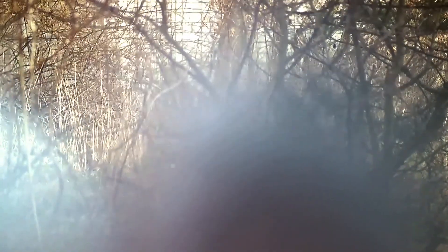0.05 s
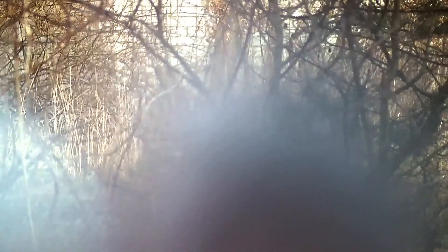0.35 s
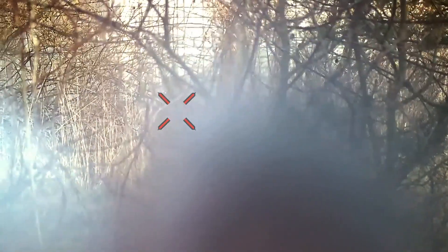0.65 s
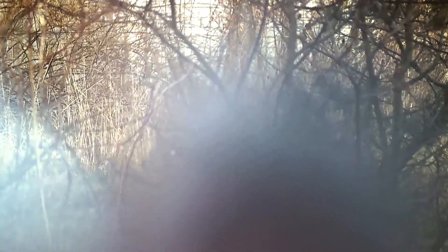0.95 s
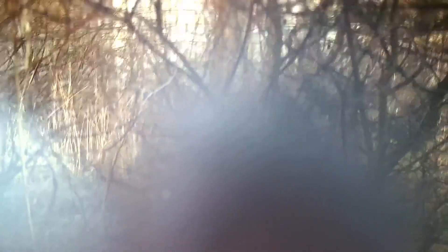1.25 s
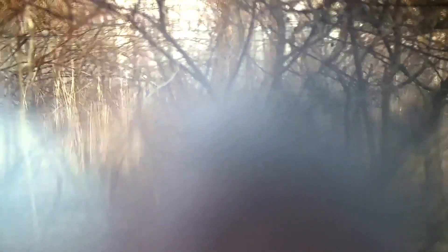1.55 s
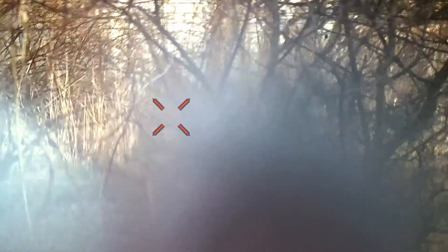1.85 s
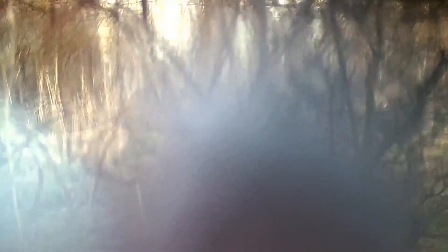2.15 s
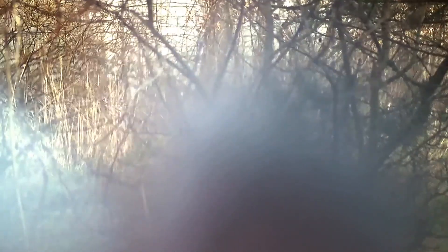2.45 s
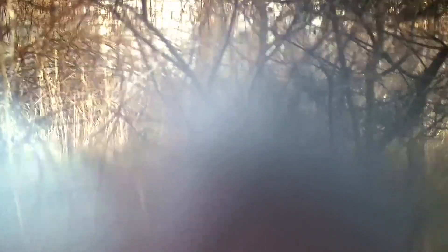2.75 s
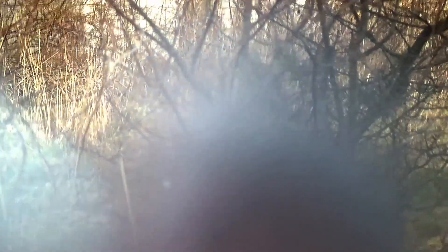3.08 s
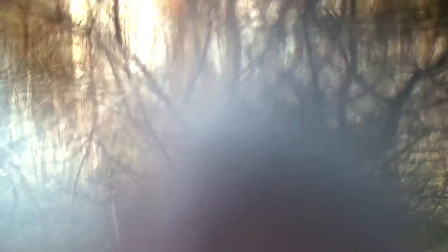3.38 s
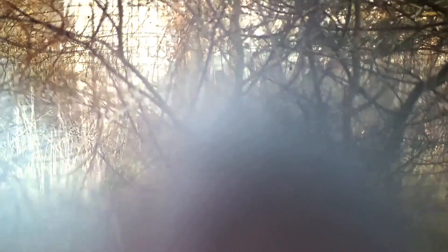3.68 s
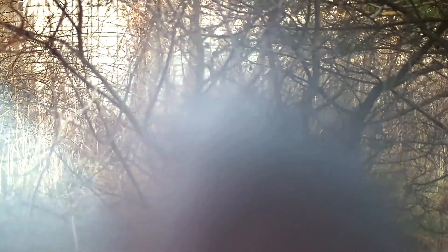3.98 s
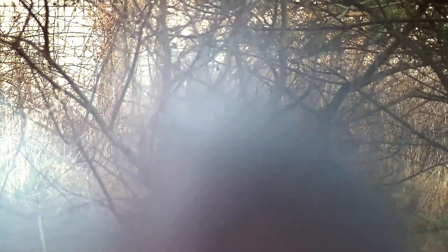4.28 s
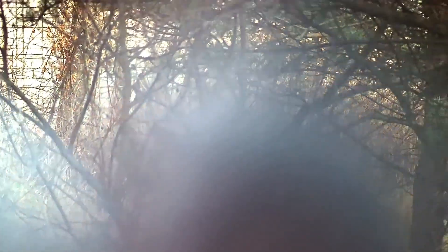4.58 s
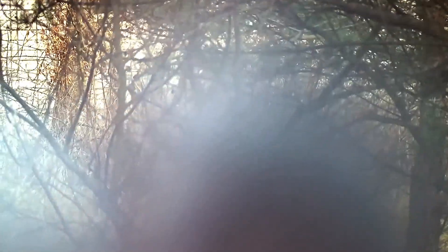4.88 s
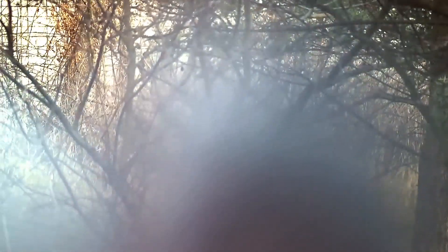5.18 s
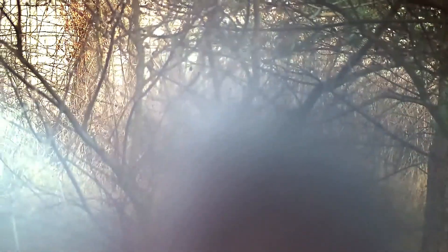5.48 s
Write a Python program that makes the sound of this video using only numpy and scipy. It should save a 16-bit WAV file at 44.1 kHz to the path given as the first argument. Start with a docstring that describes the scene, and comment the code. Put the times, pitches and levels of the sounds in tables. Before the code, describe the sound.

Close airsoft rifle shots outdoors, each a gear whirr and hard clack, come in a steady run, pause briefly, then three more follow.

```python
"""In a wood, an electric airsoft rifle fires sixteen single shots, heard from a camera on the gun.
Each shot is one gearbox cycle: the motor whines up, gears rattle, the piston slams home, the motor brakes.
Tooth forces drive the resonant modes of the gun body, and recoil sets the camera mount swinging.
The trigger clicks back between most shots, the spring rings on faintly in free vibration,
and scattering among the trees returns a soft tail."""
import sys
import numpy as np
from scipy import signal
from scipy.fft import rfft, irfft
from scipy.io import wavfile
from scipy.ndimage import uniform_filter1d

SR = 44100
rng = np.random.default_rng(int(sys.argv[2]) if len(sys.argv) > 2 else 0)


def inscribe(sig):
    """Save sig as 16-bit PCM at rate SR to the path in sys.argv[1].

    A 1-D sig is mono; a 2-D sig holds one channel per row.
    Samples are clipped to [-1, 1] before scaling.
    """
    pcm = np.round(np.clip(np.atleast_2d(sig).T, -1, 1) * 32767)
    wavfile.write(sys.argv[1], SR, pcm.astype(np.int16))


N = 248061
T = np.arange(SR // 4) / SR  # time within one event


def amp(db):
    """Decibels to amplitude ratio."""
    return 10 ** (np.asarray(db) / 20)


def unit_rms(x):
    """Normalisation to rms 1."""
    return x / np.sqrt(np.mean(x ** 2) + 1e-20)


def log_interp(points, hz):
    """Interpolation on a log-frequency axis."""
    f, value = np.transpose(points)
    return np.interp(np.log(hz + 1), np.log(f + 1), value)


def add(mix, start_s, sound):
    """Superposition: a sound joins the mix at start_s."""
    start = round(start_s * SR)
    sound = sound[max(-start, 0):]
    part = mix[max(start, 0):][:len(sound)]
    part += sound[:len(part)]


def noise(spectrum, size):
    """Spectral shaping: noise of rms 1 from (frequency_hz, gain_db) points."""
    gain = amp(log_interp(spectrum, np.fft.rfftfreq(size, 1 / SR)))
    return unit_rms(irfft(rfft(rng.standard_normal(size)) * gain, size))


def lowpass(x, hz):
    """Steep linear-phase low-pass."""
    return signal.oaconvolve(x, signal.firwin(601, hz, window=("kaiser", 8), fs=SR), "same")


def swell(t, peak_s, width_s):
    """Gaussian pulse of height 1."""
    return np.exp(-((t - peak_s) / width_s) ** 2)


# spectrum of the quiet wood: frequency_hz, gain_db
AIR_SPECTRUM = [(25, 1), (80, -5), (200, -13.5), (600, -10), (1100, -12.5), (2600, -14.5), (3400, -28),
                (5400, -30)]
def air(level_db=-77):
    """Ambient noise: a steady floor, strongest in the bass."""
    return amp(level_db) * noise(AIR_SPECTRUM, N)


# reverberation time among the trees: frequency_hz, t60_s
TREE_DECAY = [(100, 0.35), (500, 0.61), (1500, 0.57), (3000, 0.73), (5500, 0.5)]
def trees(x, far_db=-30, near_db=-17, near_t60=0.16):
    """Scattering: ground and twigs reflect quickly, the trunks return a long faint tail."""
    hz, frame_s, bands = signal.stft(rng.standard_normal(SR), SR, nperseg=256)
    decay = amp(-60 * frame_s / log_interp(TREE_DECAY, hz)[:, None])
    t = np.arange(SR) / SR
    far = signal.istft(bands * decay, SR, nperseg=256)[1][:SR] * np.minimum(t / 0.037, 1)
    near = rng.standard_normal(SR) * amp(-60 * t / near_t60) * (t > .008)
    response = amp(far_db) * far / np.linalg.norm(far) + amp(near_db) * near / np.linalg.norm(near)
    return signal.fftconvolve(x, response)[:N]


# modes of the spring and metal parts: pitch_hz, level_db, t60_s
SPRING_MODES = [(845, -62, 1), (962, -64, 1.6), (1036, -64, 2.2), (1324, -60, 1.8), (1518, -60, .8),
                (1653, -51, .72), (1879, -63, 1.7), (2272, -62, 1.6), (2509, -64, 1.7), (3025, -60, .9),
                (3375, -62, .78), (4024, -61, 1.1), (5222, -67, .85)]
def spring_ring(earlier_s=0.24):
    """Free vibration: metal parts ring after each blow, and at first from an earlier shot."""
    t, out = np.arange(2 * SR) / SR, np.zeros(N)
    ring = sum(amp(db - 60 * t / t60) * np.sin(2 * np.pi * hz * t) for hz, db, t60 in SPRING_MODES)
    add(out, -earlier_s, ring)
    for _, blow_s, _ in SHOT_CYCLES:
        add(out, blow_s + rng.uniform(0, 0.0052), ring)
    return out


def swing(hz, t60, rise_s=0.0025):
    """Damped oscillation, at nearly the same pitch each time."""
    pitch_hz = hz * (1 + .03 * rng.standard_normal())
    return np.sin(2 * np.pi * pitch_hz * T) * amp(-60 * T / t60) * (1 - np.exp(-T / rise_s))


# shifts of the gun in the hands: start_s, gain_db
HAND_BUMPS = [(3.923, -18), (4.392, -48), (4.686, -54.5)]
def handling(rustle_db=-9):
    """Impulse response: each shift of the gun gives a low thump and a rustle."""
    out = np.zeros(N)
    for start_s, db in HAND_BUMPS:
        add(out, start_s, amp(db) * (swing(hz=65, t60=0.066) + amp(rustle_db) * click()))
    return out


# pushes on the mount after the pull, in a nominal cycle: delay_s, pitch_hz, gain_db, t60_s
RECOIL_PUSHES = [(0.018, 110.1, -28, 0.056), (0.054, 82.05, -36, 0.039), (0.088, 62, -20.5, 0.066),
                 (0.104, 131.8, -19, 0.03)]
def recoil(rumble_db=-50, rumble_t60=0.95):
    """Reaction forces swing the camera mount, which rumbles on after the blow."""
    out = np.zeros(N)
    decay = amp(rumble_db - 60 * np.arange(SR) / SR / rumble_t60)
    for pull_s, blow_s, shot_db in SHOT_CYCLES:
        pace = CYCLE_S / (blow_s - pull_s)
        for delay_s, hz, db, t60 in RECOIL_PUSHES:
            add(out, pull_s + delay_s / pace, amp(db + shot_db) * swing(hz, t60))
        add(out, blow_s, noise([(15, 5), (60, -11), (200, -16), (1000, -50.5)], SR) * decay)
    return out


# resonances of the gun body: pitch_hz, bandwidth_hz, gain_db
BODY_MODES = [(513.6, 43, -1.5), (750, 77, 8), (852.5, 150, 4), (1020, 84, 4), (1440, 200, 3.5),
              (1740, 142, 6.5), (2217, 220, 3.5), (2492, 200, 0), (2975, 260, 2.5), (3737, 120, 0),
              (4960, 95, -14)]
def body(force, direct=0.011):
    """Modal resonance: a force rings the body's modes; a little passes straight through."""
    t = T[:SR // 20]
    ring = np.zeros(len(t))
    for hz, bandwidth_hz, db in BODY_MODES:
        damping = np.pi * bandwidth_hz
        ring += amp(db) * 2 * damping / SR * np.exp(-damping * t) * np.cos(2 * np.pi * hz * t)
    return signal.fftconvolve(force, ring)[:len(force)] + direct * force


def scrape(level_db=-21, peak_s=0.03, width_s=0.0071):
    """Sliding friction: the returning trigger excites the body."""
    force = signal.lfilter([1], [1, -.6], rng.standard_normal(len(T)))
    return amp(level_db) * unit_rms(body(force)) * swell(T, peak_s, width_s)


def click(chatter_t60=0.048, snap=5, tilt=0.7, level_db=1):
    """Impact excitation: a small part snaps against its stop and chatters briefly."""
    force = rng.standard_normal(len(T)) * amp(-60 * T / chatter_t60)
    force[0] += snap
    sound = body(signal.lfilter([1], [1, -tilt], force))
    return amp(level_db) * sound / abs(sound).max()


# returns of the trigger: click_s, gain_db, rebound_gain_db
TRIGGER_RETURNS = [(.327, -16, -35), (.604, -13, -19.5), (1.212, -12.5, -15.5), (1.528, -18.5, -38),
                   (1.871, -13.5, -34), (2.444, -16, -27.5), (2.778, -14, -38.5), (3.111, -12.5, -30),
                   (3.406, -11, -15.5), (3.702, -14.5, -32), (5.001, -17, -21.5), (5.304, -11.5, -16)]
def trigger(scrape_lead_s=0.037, rebound_s=0.016):
    """Elastic rebound: the trigger scrapes back, strikes its stop and bounces once."""
    out = np.zeros(N)
    for click_s, db, rebound_db in TRIGGER_RETURNS:
        add(out, click_s - scrape_lead_s, amp(db) * scrape())
        add(out, click_s, amp(db) * click())
        add(out, click_s + rebound_s, amp(rebound_db) * click())
    return out


def coil_buzz(hz=3900, width_hz=380, level_db=-26, t60=0.2):
    """Contact noise in a narrow band: the released spring's coils chatter against their guide."""
    detuning = 2 * (np.fft.rfftfreq(len(T), 1 / SR) - hz) / width_hz
    band = irfft(rfft(rng.standard_normal(len(T))) / (1 + detuning ** 2), len(T))
    return unit_rms(band) * amp(level_db - 60 * T / t60) * np.minimum(T / 0.0015, 1)


def squawk(start_hz=1050, end_hz=780, level_db=-17, peak_s=.0125, width_s=0.0042, vary_db=2):
    """Backlash: the starting motor takes up the slack in the gears with a short falling tone."""
    hz = np.interp(T, [peak_s - width_s, peak_s + width_s], [start_hz, end_hz])
    level = amp(level_db + vary_db * rng.standard_normal())
    return level * np.sin(2 * np.pi * (np.cumsum(hz) / SR + rng.random())) * swell(T, peak_s, width_s)


CYCLE_S, STOP_S = .106, 0.1344  # nominal times from the pull: the piston lands, the gears come off load
def motor_speed(t, spin_up_s=.0325, shape=1.45, brake_s=.095, half_speed_s=.032):
    """Inertia: speed, as a share of the top, rises from rest, levels off and falls under braking."""
    spin_up = 1 - np.exp(-(t / spin_up_s) ** shape)
    return spin_up / (1 + (np.maximum(t - brake_s, 0) / half_speed_s) ** 2)


def gear_rattle(t, impacts_per_s=700, level_db=-18, slack_s=0.014, loose_s=.078, fall_db_per_s=201):
    """Random excitation: knocks and grinding grow with speed and die after the stop."""
    knocks = unit_rms(rng.standard_normal(len(T)) * (rng.random(len(T)) < impacts_per_s / SR))
    grinding = rng.standard_normal(len(T))
    loose_db = 1.0 * (t > loose_s)  # the gears rattle more freely once the spring is let go
    db = level_db + loose_db - fall_db_per_s * np.maximum(t - STOP_S, 0)
    envelope = np.minimum(t / slack_s, 1) * motor_speed(t) ** .6 * amp(db)
    return unit_rms(body(knocks + grinding)) * envelope


# tooth pressure at motor start, cocking, braking and the stop, in a nominal cycle: peak_s, width_s, gain_db
LOAD_PEAKS = [(0.021, 0.0079, 11.5), (.064, 0.014, 7), (.103, .008, 5), (0.132, 0.0075, 5.5)]
def tooth_load(t, rise_s=0.018, fall_db_per_s=1300):
    """Contact force: the whine comes in, swells with each press on the teeth and dies at the stop."""
    db = sum(gain_db * swell(t, peak_s, width_s) for peak_s, width_s, gain_db in LOAD_PEAKS)
    return np.minimum(t / rise_s, 1) ** 2 * amp(db - fall_db_per_s * np.maximum(t - STOP_S, 0))


# first three harmonics of the gear mesh at top speed: gain_db
MESH_HARMONICS = [-8, -11, -14]
def gearbox(pace, top_hz=1906, whine_db=-19.5, flutter=0.016, spread=0.012, shudder=0.4, runout=.18):
    """Forced vibration: the mesh tone sweeps through the body's modes while the teeth rattle."""
    wobble, tremor = (noise([(1, 0), (200, 0), (600, -30), (2000, -100)], len(T)) for _ in range(2))
    t = T * pace  # nominal time: a slower shot stretches the whole cycle
    speed = motor_speed(t)
    mesh_hz = top_hz * speed * (1 + spread * rng.standard_normal() + flutter * wobble)
    phase = 2 * np.pi * (np.cumsum(mesh_hz) / SR + 10 * rng.random())
    shaft = 1 + runout * np.sin(phase / 10)  # the ten-tooth pinion presses harder once a turn
    teeth = sum(amp(db) * speed ** k * np.sin((k + 1) * phase) for k, db in enumerate(MESH_HARMONICS))
    whine = body(np.sqrt(2) * teeth * amp(whine_db) * tooth_load(t) * (1 + shudder * tremor))
    fade = np.clip((T[-1] - T) / 0.11, 0, 1)
    return shaft * (whine + gear_rattle(t)) * fade


# spectrum of the piston's blow: frequency_hz, gain_db
BLOW_SPECTRUM = [(88, -44.5), (150, -9.5), (312, -15.5), (480, -2), (640, 0.5), (846, -8.5), (1210, -5),
                 (1680, -5), (1920, -7.5), (2150, -2.5), (2330, -6.5), (3390, -8), (3870, -1),
                 (4300, -13.5), (5300, -20.5), (6890, -49.5), (11700, -120)]
def piston(level_db=-7, rise_s=0.00047, hold_s=0.0039, t60=.05, pop_hz=630, pop_db=-11, pop_t60=0.045):
    """Impact and air-column resonance: the piston hits the cylinder head, its puff rings the barrel."""
    decay_s = np.maximum(T - hold_s, 0)
    crack = noise(BLOW_SPECTRUM, len(T)) * amp(level_db - 60 * decay_s / t60)
    pop = np.sin(2 * np.pi * pop_hz * rng.uniform(0.85, 1.2) * T) * amp(pop_db - 60 * decay_s / pop_t60)
    return (crack + pop) * (1 - np.exp(-T / rise_s))


# trigger pull and piston blow of each shot: pull_s, blow_s, gain_db
SHOT_CYCLES = [(.134, 0.236, -1), (0.424, 0.527, 1), (0.713, 0.82, -0.5), (1.026, 1.132, -1),
               (1.359, 1.465, -0.5), (1.669, 1.774, 0), (1.969, 2.079, 0), (2.277, 2.383, 0),
               (2.592, 2.697, 0), (2.91, 3.015, 0), (3.205, 3.311, 1), (3.51, 3.618, 0.5),
               (3.817, 3.924, 0), (4.828, 4.933, -2.5), (5.112, 5.216, -1.5), (5.432, 5.538, 0.5)]
def shots():
    """Stored elastic energy: the gears cock the spring, which then drives the piston home."""
    out = np.zeros(N)
    for pull_s, blow_s, db in SHOT_CYCLES:
        pace = CYCLE_S / (blow_s - pull_s)
        add(out, pull_s, amp(db) * (gearbox(pace) + squawk()))
        add(out, blow_s, amp(db) * (piston() + coil_buzz()))
    return out


def scene():
    """Superposition of the quiet wood, the reflections and the rifle's direct sound."""
    gun = shots() + trigger()
    return (air() + trees(gun) + spring_ring() + handling() + recoil() + gun)[None]


# when the treble comes in during each shot: onset_s
TREBLE_ONSETS = [.241, .516, .789, 1.064, 1.431, 1.704, 2.070, 2.345, 2.619, 2.985, 3.258, 3.533, 3.898,
                 4.900, 5.178, 5.453]
def muffle(x, dull_hz=3230, bright_hz=5380, lead_s=0.017):
    """Time-varying bandwidth: each shot starts dull, and its treble comes in abruptly."""
    dull = np.zeros(N)
    for (pull_s, _, _), onset_s in zip(SHOT_CYCLES, TREBLE_ONSETS):
        length = max(round((onset_s - pull_s + lead_s) * SR), 1)
        add(dull, pull_s - lead_s, np.ones(length))
    dull = uniform_filter1d(dull, size=200)
    return dull * lowpass(x, dull_hz) + (1 - dull) * lowpass(x, bright_hz)


def record(dry, overload_db=-6.5, ceiling_db=-8.4, recovery_db_per_s=500, block=24):
    """Saturation: the sound overloads softly and loses its top treble; a limiter catches the rest."""
    x = muffle(amp(overload_db) * np.tanh(dry[0] / amp(overload_db)))
    peaks = np.maximum.reduceat(abs(x), np.arange(0, N, block))
    over_db = np.maximum(20 * np.log10(peaks + 1e-9) - ceiling_db, 0)
    recovery_db = np.arange(len(peaks)) * block / SR * recovery_db_per_s
    held_db = np.maximum.accumulate(over_db + recovery_db) - recovery_db
    gain = amp(-np.repeat(held_db, block)[:N])  # its steps tick faintly
    return lowpass(x * gain, hz=15900)[None]


dry = scene()
out = record(dry)
inscribe(out)
```